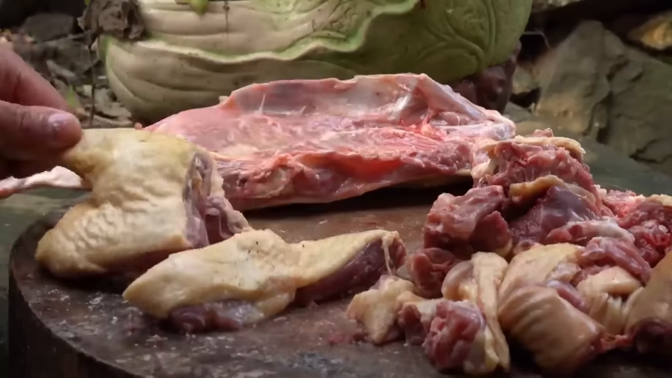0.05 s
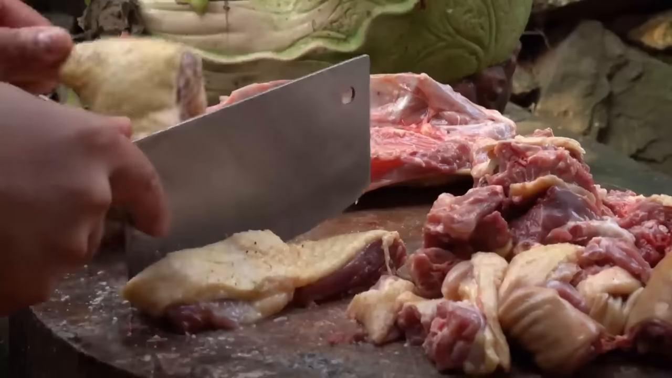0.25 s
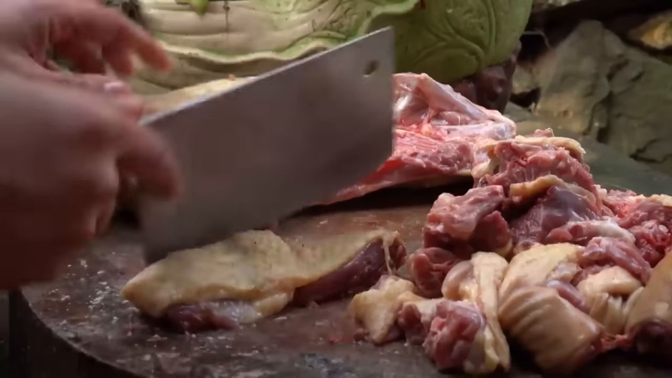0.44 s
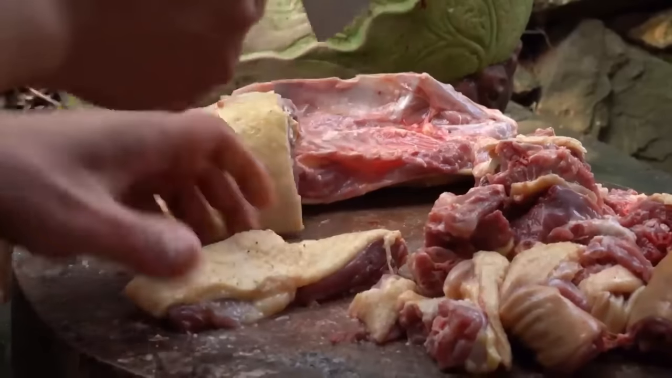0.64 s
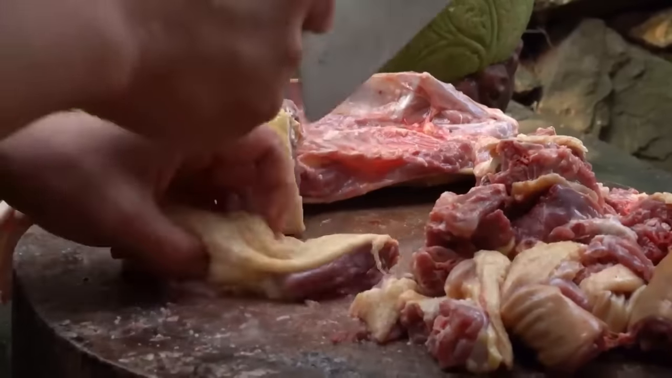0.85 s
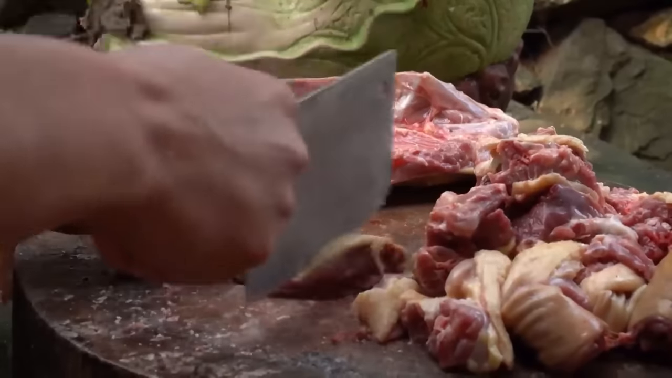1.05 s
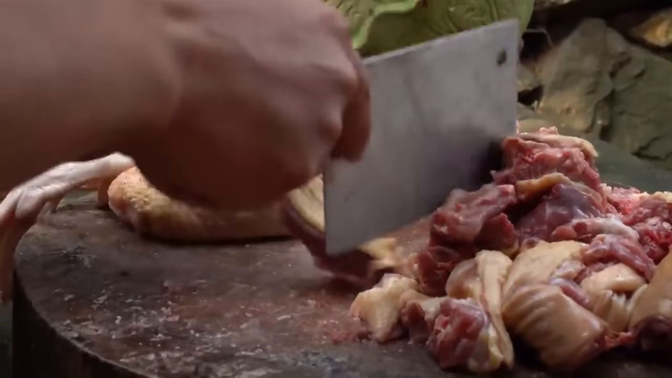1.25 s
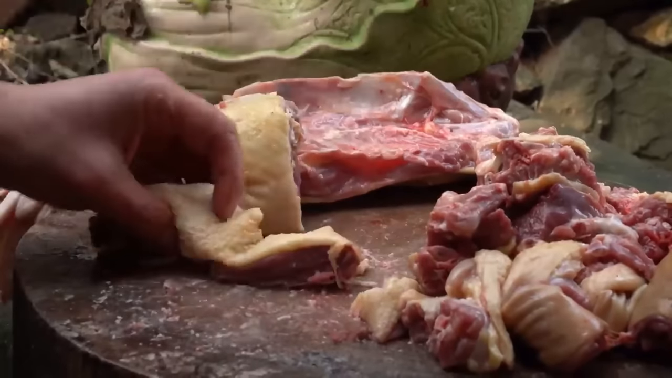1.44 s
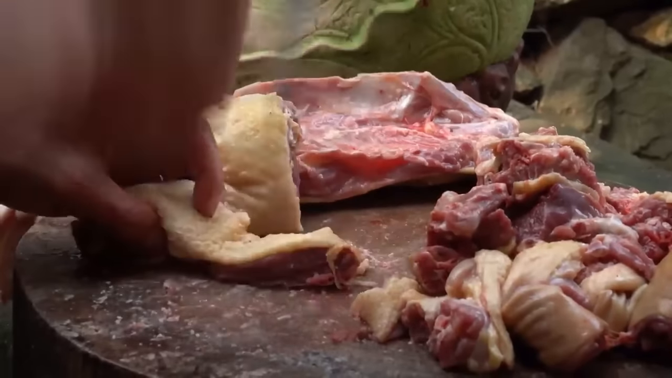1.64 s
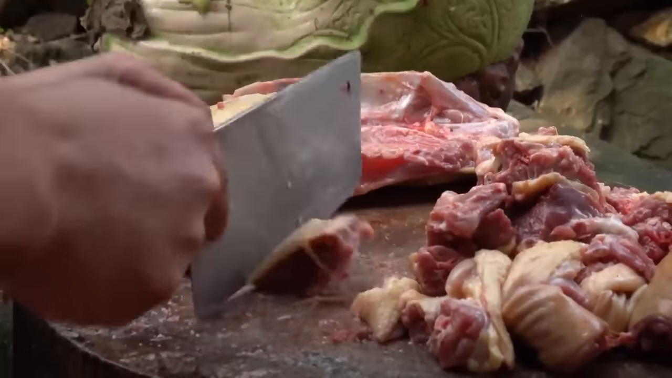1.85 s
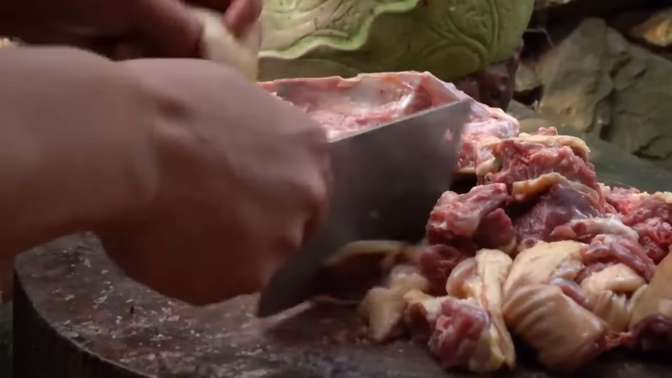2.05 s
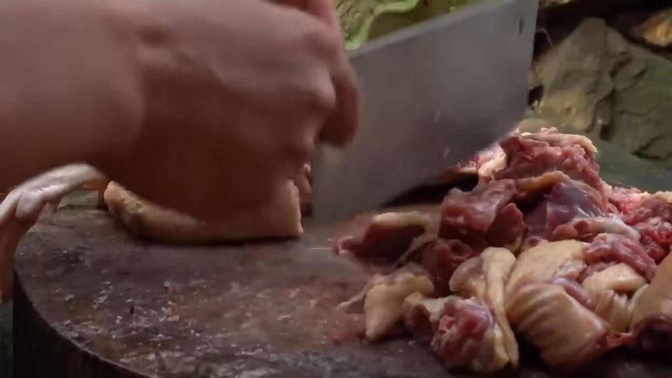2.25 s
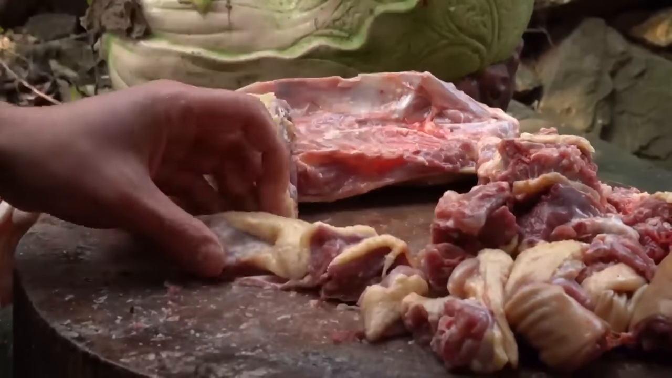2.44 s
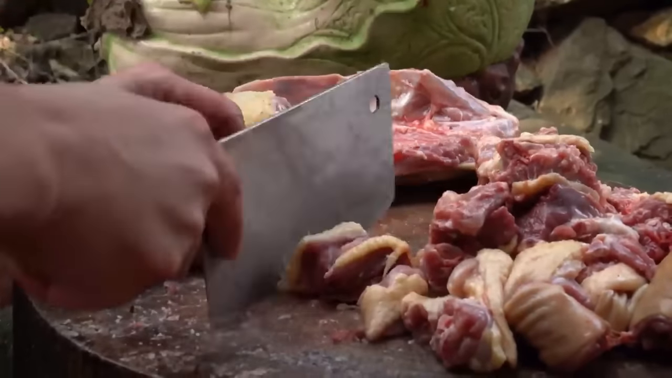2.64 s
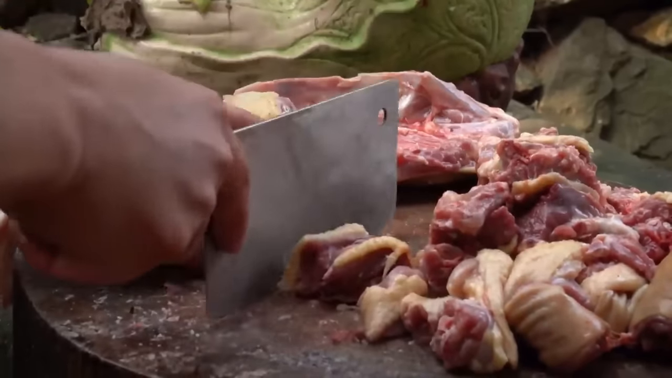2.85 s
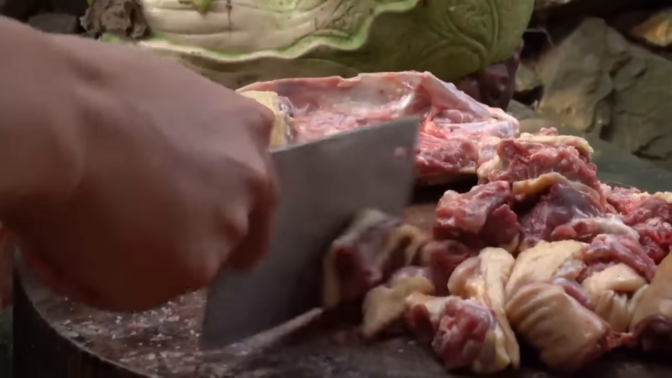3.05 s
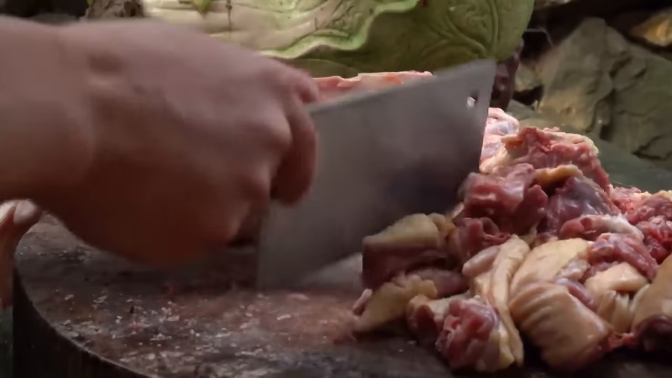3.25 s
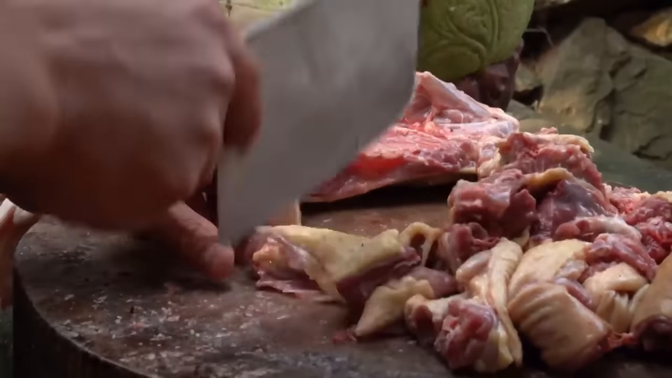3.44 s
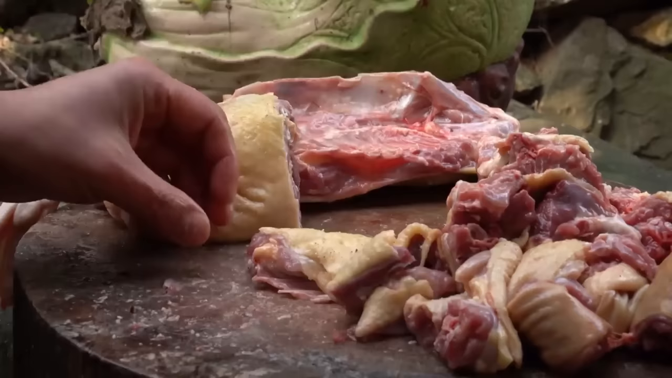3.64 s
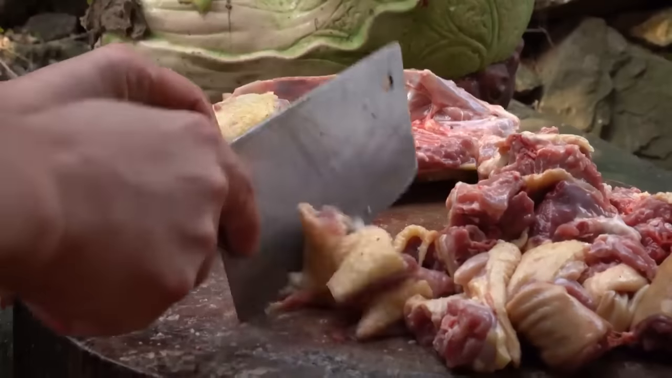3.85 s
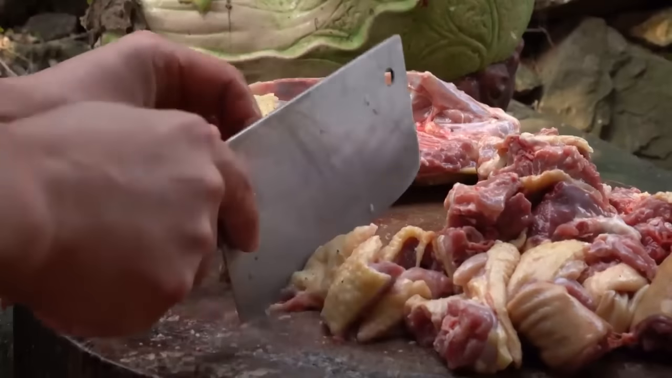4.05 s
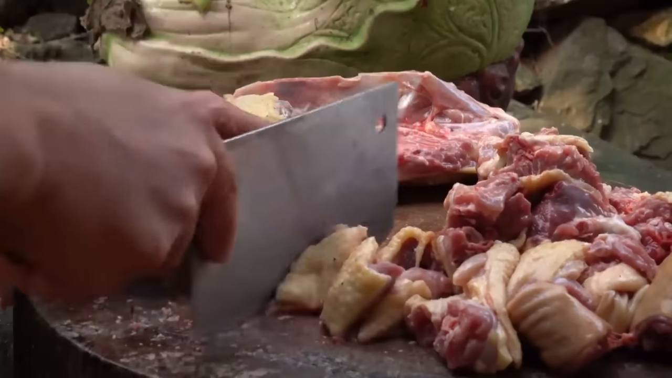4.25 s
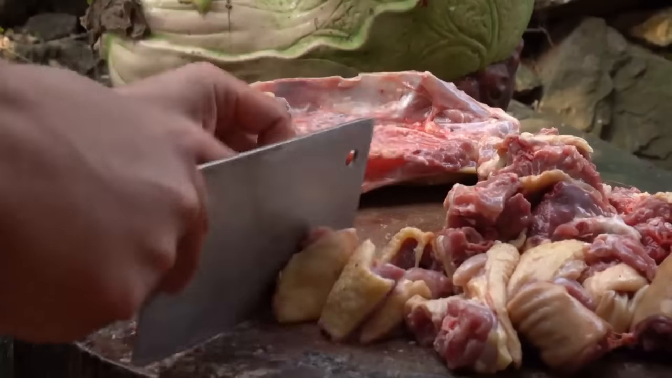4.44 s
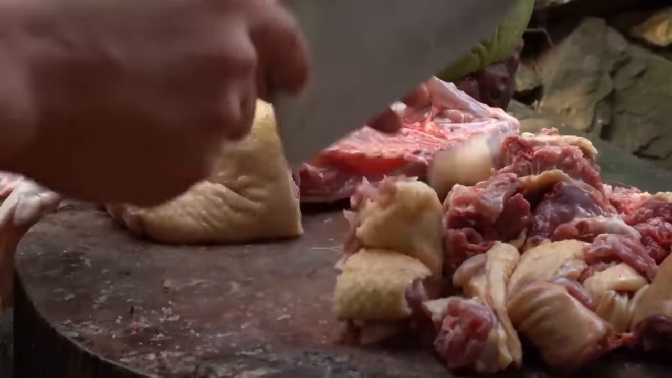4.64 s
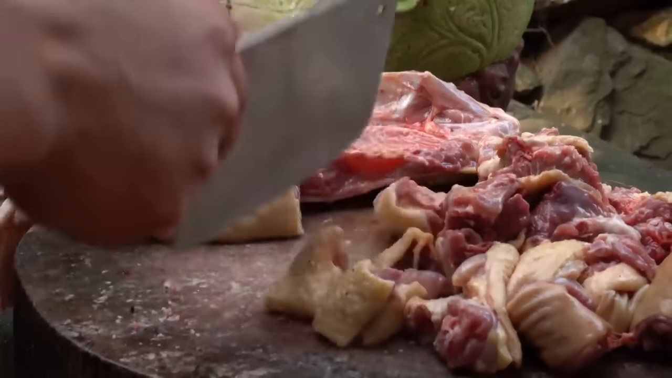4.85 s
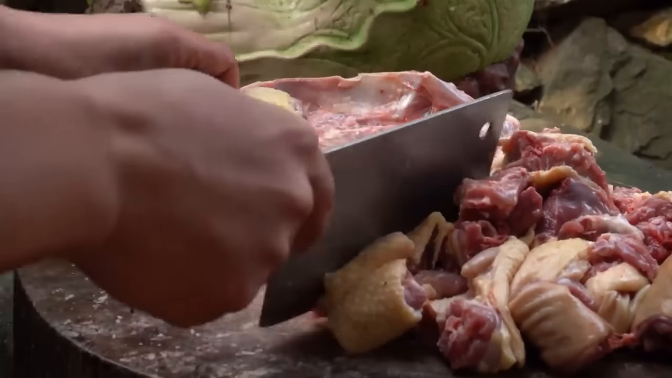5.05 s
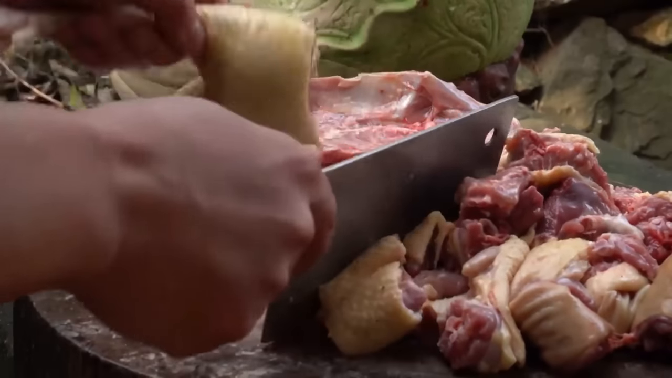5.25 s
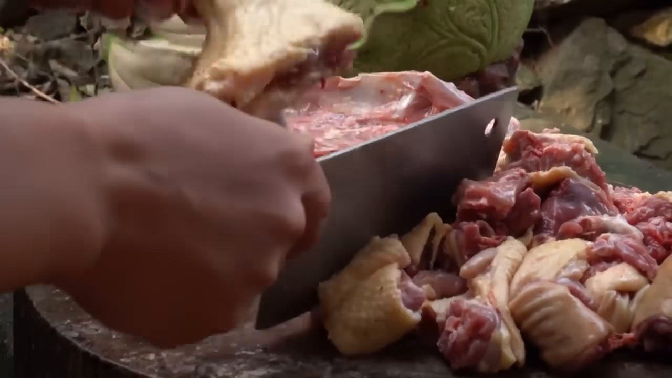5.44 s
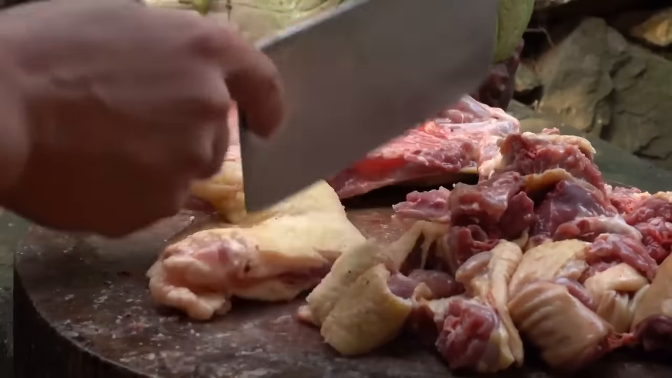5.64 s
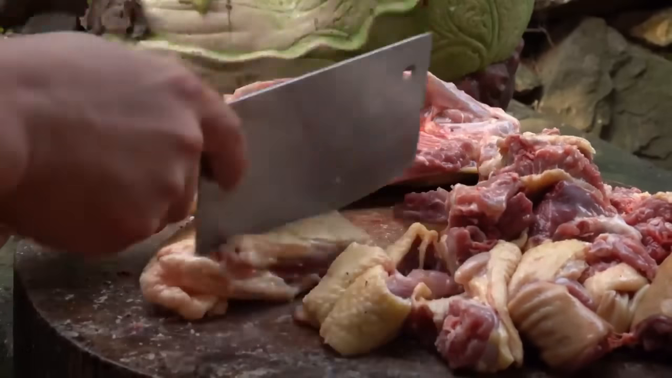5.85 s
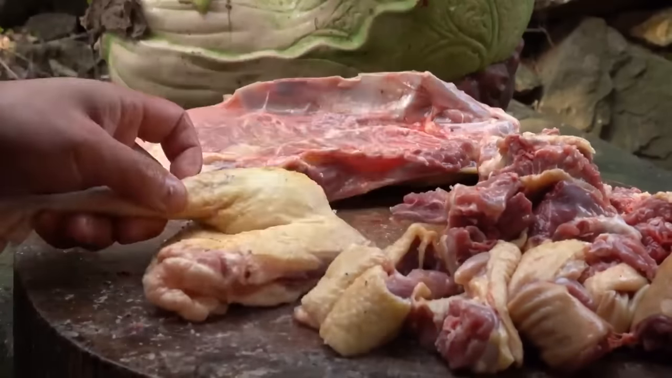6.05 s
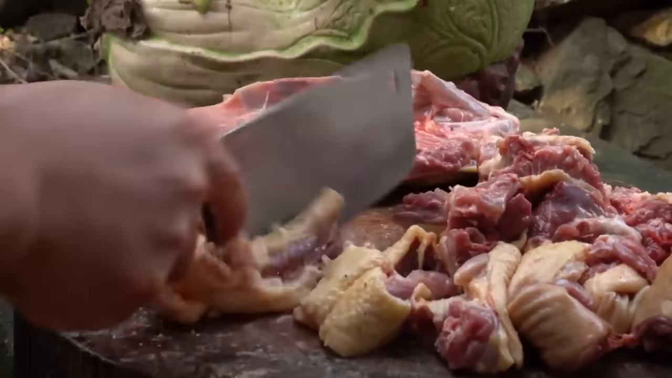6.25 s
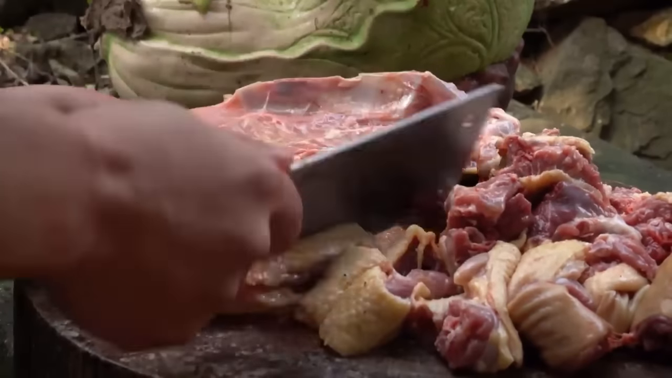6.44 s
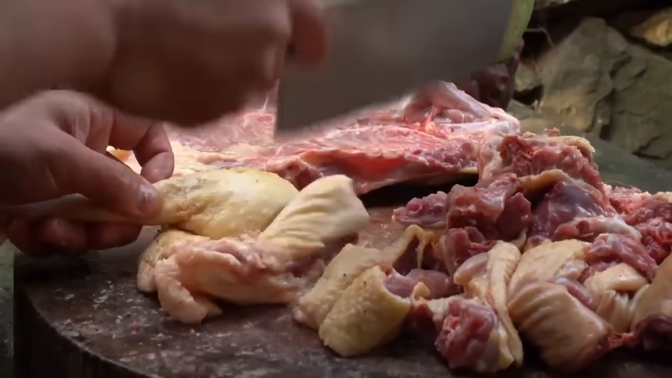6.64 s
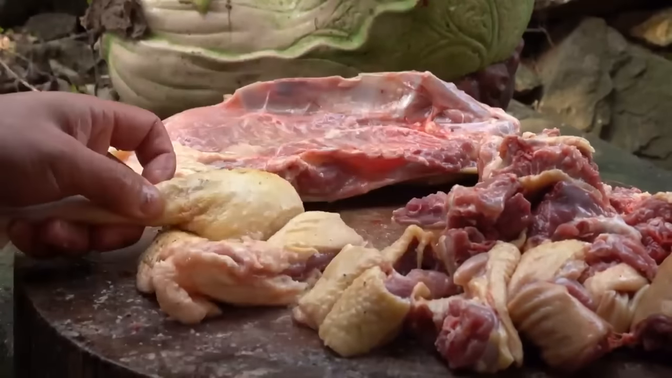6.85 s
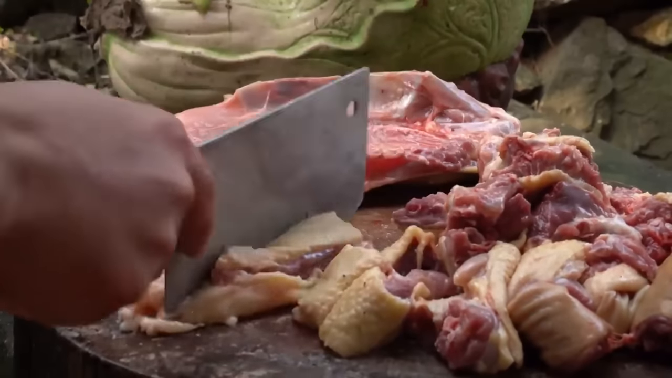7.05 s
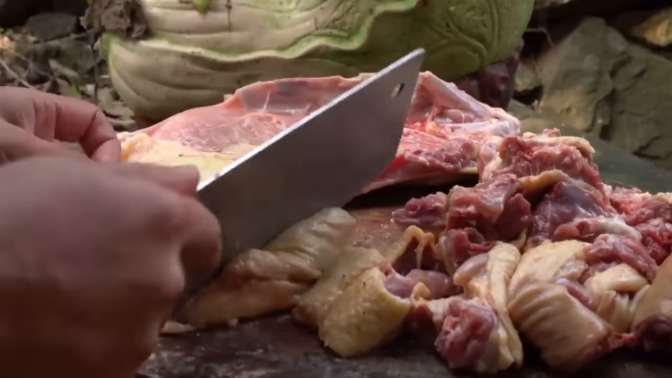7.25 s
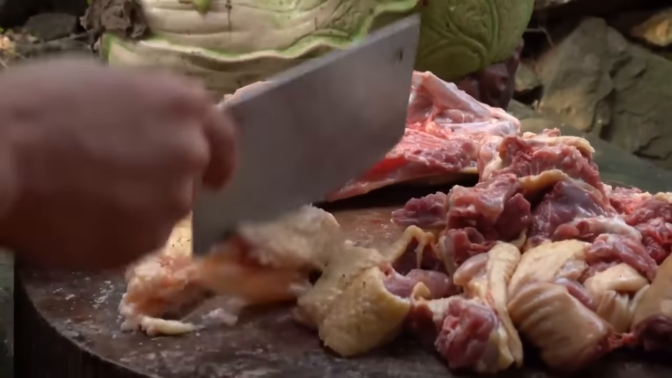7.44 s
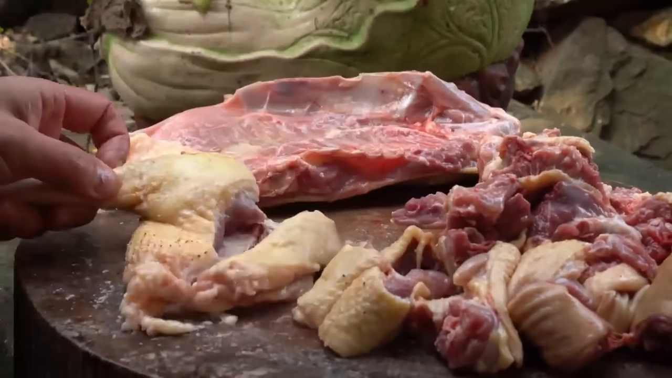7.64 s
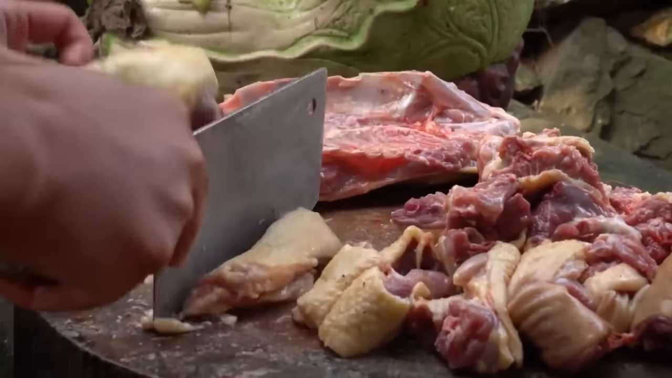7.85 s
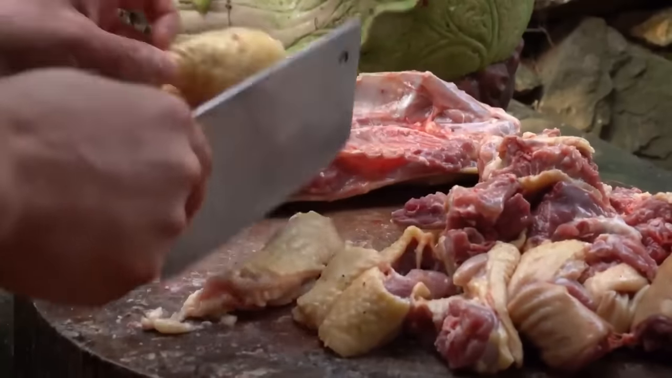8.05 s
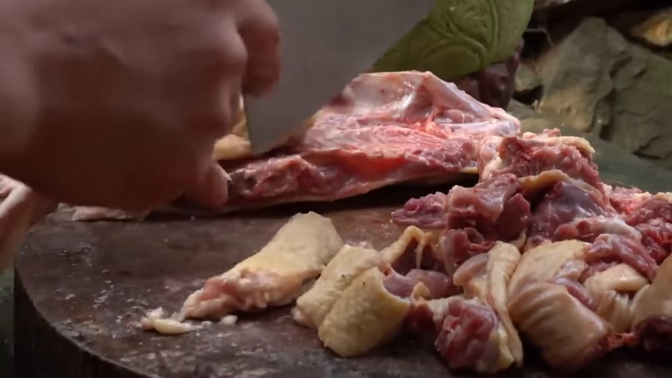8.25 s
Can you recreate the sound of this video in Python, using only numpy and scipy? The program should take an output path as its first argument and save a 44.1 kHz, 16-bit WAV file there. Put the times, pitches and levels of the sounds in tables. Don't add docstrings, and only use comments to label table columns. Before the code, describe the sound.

Close stereo sound of butchering in an open yard: splintering bone cracks, solid wooden thuds and knocks, then ringing metal and brief diffuse echoes. Strong chops alternate with lighter contacts, blade drags, moist peeling, small clicks and short squeaks. The later blows come quicker, one of them ringing loudest. Steady soft air lies beneath, with a few hoarse distant bird whistles.

```python
import sys
import numpy as np
from scipy import signal
from scipy.fft import rfft, irfft, next_fast_len
from scipy.io import wavfile
from scipy.ndimage import uniform_filter1d

SR = 44100
rng = np.random.default_rng(int(sys.argv[2]) if len(sys.argv) > 2 else 0)


def volts(x):
    e = np.asarray(x, float) / 20
    return 10 ** e


def pcm_store(signal):
    levels = np.round(np.clip(np.atleast_2d(signal), -1, 1) * 32767)
    wavfile.write(sys.argv[1], SR, levels.astype(np.int16).T)


N = 366471
MIC_CUT_HZ = 150


def rms_one(x):
    return x / np.sqrt(np.mean(x ** 2) + 1e-20)


def at_hz(points, hz):
    table_hz, values = np.transpose(points)
    return np.interp(np.log(hz), np.log(table_hz), values)


def add(track, s, sound):
    i = round(s * SR)
    track[..., i:i + sound.shape[-1]] += sound[..., :N - i]


def pan(db):
    return volts([[db / 2], [-db / 2]])


def ring(x, hz, t60):
    r = volts(-60 / (max(t60, .001) * SR))
    w = 2 * np.pi * hz / SR
    return signal.lfilter([0, np.sin(w)], [1, -2 * r * np.cos(w), r * r], x + 1e-18)


def edge(x, hz, kind):
    return signal.sosfilt(signal.butter(2, hz, kind, fs=SR, output="sos"), x)


def grains(shape, per_s, spread_db):
    sizes = volts(spread_db * np.minimum(rng.exponential(1, shape), 4)) * rng.choice([-1, 1], shape)
    return sizes * (rng.random(shape) < per_s / SR)


EDGES = 30 * 2 ** np.arange(0, 9.6, .5)
ECHO_PATCHY_DB, ECHO_PATCH_HZ = 2.2, 35


def bands(white, spectrum, likeness, t60=None):
    out, t = 0, np.arange(white.shape[-1]) / SR
    for k, (low, high) in enumerate(zip(EDGES, np.minimum(EDGES[1:], .49 * SR))):
        hz = np.sqrt(low * high)
        level_db = at_hz(spectrum, hz)
        if t60:
            patches = rms_one(edge(rng.standard_normal(len(t)), ECHO_PATCH_HZ, "low"))
            level_db = level_db - 60 * t / at_hz(t60, hz) + ECHO_PATCHY_DB * patches
        elif level_db < -30:
            continue
        band = signal.butter(2, [low, high], "band", fs=SR, output="sos")
        mid, side = signal.sosfilt(band, white[k % 2])
        alike = np.clip(at_hz(likeness, hz), 0, 1)
        stereo = np.sqrt(1 + alike) * mid + np.sqrt(1 - alike) * side * [[1], [-1]]
        out = out + volts(level_db) * stereo
    return out


# (frequency [Hz], density [dB per Hz])
YARD = [(18, -59), (30, -35), (167, -3.5), (455, 0.5), (547, 4.5), (752, 3), (1530, -1.5), (5160, -5),
        (6550, -11), (14800, -7), (16500, -25)]
# (frequency [Hz], likeness [0-1])
YARD_LIKENESS = [(60, 0.7), (180, 1), (550, 0.4), (1650, 0), (4970, 0.47), (15000, 0.09)]
YARD_DB = -61.5


def yard_air():
    return volts(YARD_DB) * rms_one(bands(rng.standard_normal((2, 2, N)), YARD, YARD_LIKENESS))


# (start [s], length [s], first pitch [Hz], last pitch [Hz], level [dB])
BIRD = [
    (1.53, 0.13, 2980, 2930, -49.5),
    (3.544, 0.22, 3060, 2780, -49.5),
    (4.528, 0.137, 3530, 3400, -44.5),
    (4.65, .11, 3100, 2780, -43),
    (4.75, .06, 2800, 2750, -50),
    (8.219, .12, 3500, 3300, -46.5),
]
CALL_ATTACK_S, CALL_RELEASE_S, CALL_BLUR_HZ, BIRD_TRIM_DB = 0.016, .05, 90, -9


def bird():
    out = np.zeros((2, N))
    for s, length_s, first_hz, last_hz, db in BIRD:
        t = np.arange(round(length_s * SR)) / SR
        slide = (1 + np.cos(np.pi * np.clip(t / length_s / 0.91, 0, 1))) / 2
        hz = last_hz + (first_hz - last_hz) * slide
        shape = np.clip(np.minimum(t / CALL_ATTACK_S, (length_s - t) / CALL_RELEASE_S), 0, 1)
        whistle = np.sin(2 * np.pi * np.cumsum(hz) / SR)
        add(out, s, volts(db + BIRD_TRIM_DB) * shape * whistle * [[1], [1]])
    blur = rms_one(edge(rng.standard_normal((2, N)), CALL_BLUR_HZ, "low"))
    return out * (0.23 + blur)


# (time [s], boom of the stand [dB], knock of the wood [dB], crack of the bone [dB])
SENDS = [(0.218, -5, -4, -14.5), (1.291, -23.5, -38.5, -24.5), (1.78, -1.5, 1.5, -16.5),
         (2.726, -5.5, 0.5, -18.5), (3.933, 1, -3.5, -13.5), (5.019, -25, -20, -40), (5.684, -55, -30, -37),
         (6.011, -41, -52, -43), (6.346, 8.5, -2, -16.5), (7.008, 4, -0.5, -21), (7.761, -35, -42, -30),
         (7.828, -10, -2.1, -18.5)]
CLACK_OVER_CRACK_DB = 6


def sends():
    out, parts = np.zeros(N), np.tile(signal.unit_impulse(SR // 40), (4, 1))
    for k, hz in enumerate((450, 1500, 4500)):
        parts[k] = edge(edge(parts[k], hz, "low"), hz, "low")
        parts[k + 1] = edge(edge(parts[k + 1], hz, "high"), hz, "high")
    for s, boom_db, knock_db, crack_db in SENDS:
        add(out, s, volts([boom_db, knock_db, crack_db + CLACK_OVER_CRACK_DB, crack_db]) @ parts)
    return out


# (frequency [Hz], density [dB per Hz])
ECHO = [(24, -71), (40, -48.5), (438, -13.5), (782, -6), (1000, -2.5), (1360, -3), (1710, 2), (2830, -4),
        (9010, -6), (14900, -30.5), (16500, -68)]
# (frequency [Hz], decay by 60 dB [s])
ECHO_T60 = [(60, 0.61), (250, 0.55), (700, .35), (2000, 0.28), (6000, 0.27), (14000, 0.14)]
# (frequency [Hz], likeness [0-1])
ECHO_LIKENESS = [(60, 1), (250, 1), (700, 0.6), (1500, 0.4), (4000, 0.55), (12000, 0)]


def echoes(send):
    t = np.arange(SR) / SR
    answer = bands(rng.standard_normal((2, 2, SR)), ECHO, ECHO_LIKENESS, ECHO_T60)
    early_rms = np.sqrt(np.mean(answer[:, :SR // 20] ** 2))
    answer = answer / early_rms * np.clip((t - .002) / 0.02, 0, 1)
    return volts(-1.0) * signal.fftconvolve(send[None], answer, axes=1)[:, :N]


STROKE_ROUNDNESS = 1.06


def swells(rows):
    t, level_db = np.arange(0, N, 32) / SR, -110
    for s, rise_s, fall_s, db in rows:
        away = np.where(t < s, (s - t) / max(rise_s, .005), (t - s) / max(fall_s, .005))
        level_db = np.maximum(level_db, db - 20 * away ** STROKE_ROUNDNESS)
    return np.interp(np.arange(N) / SR, t, level_db)


# (peak
# [s], rise [s], fall [s], hiss level [dB], dull rub over the hiss [dB])
STROKES = [(.38, 0.046, 0.57, -44.5, -5), (.83, 0.099, 0.4, -45.5, -0.2), (5.677, 0.02, 0.08, -43, -6.5),
           (1.46, .05, 0.25, -49, -14), (2.133, 0.02, 0.03, -34, 6), (2.196, 0.071, 0.084, -42, 2),
           (2.416, 0.014, 0.045, -33, -4.5), (3.03, 0.14, 0.45, -44, -1.5),
           (3.137, 0.04, 0.07, -37.5, -3.5), (3.182, 0.071, 0.081, -40, -1.5), (4.361, .09, 0.18, -37, -10),
           (4.444, 0.22, 0.072, -34, -7.5), (4.579, 0.043, .13, -40.5, -3.5),
           (4.74, 0.047, 0.071, -50.5, 0.5), (5.07, 0.023, 0.1, -36, 0), (5.16, .06, 0.25, -51, -12),
           (5.28, 0.048, .04, -46, -3), (6.58, 0.03, 0.075, -43.5, -7), (6.77, 0.092, 0.072, -45.5, -3),
           (6.816, 0.028, 0.087, -43.5, 1.5), (5.935, .015, .06, -50, -3), (7.275, 0.012, 0.13, -41, -2.5),
           (8.15, 0.058, 0.11, -55, 6), (1.31, 0.015, 0.1, -27, -2.5), (6.015, 0.012, 0.14, -30, -6)]
# (peak [s], hiss level [dB], dull rub over the hiss [dB])
SWINGS = [
    (0.207, -46, 2),
    (1.278, -48.5, -7),
    (2.71, -55, 1),
    (5.95, -55, 0.5),
    (6.991, -56.5, 8),
]
# (time [s], level [dB])
HANDLING = [(0, -52), (.65, -50.5), (.97, -57.5), (1.25, -56.5), (1.6, -64), (1.76, -58.5), (2.2, -57),
            (2.449, -59.5), (3.3, -58), (3.67, -65), (3.921, -56.5), (4.76, -59), (5.0, -64), (5.4, -62.5),
            (6.3, -57.5), (6.65, -56), (7.5, -56.5), (8.31, -55)]
# (peak [s], rise [s], fall
# [s], level [dB])
PEELS = [
    (.2, .1, 0.038, -43),
    (.43, 0.6, 0.43, -45),
    (1.45, .04, 0.36, -68.5),
    (3.04, 0.13, 0.58, -50.5),
    (4.364, 0.027, .15, -39),
    (6.014, .012, 0.11, -29),
    (6.816, 0.023, 0.057, -46.5),
]
# (frequency [Hz], width [Hz], level [dB])
SCRAPE = [(1053, 66, -4.5), (2200, 90, -9), (3920, 67, -7), (4610, 130, -4), (6710, 120, -11.5),
          (9380, 170, -7.5)]
# (frequency [Hz], density [dB per Hz])
RUB = [(88, -33), (150, -23), (593, -6.5), (871, -6.5), (1060, -1.5), (1160, -6), (2160, 2), (4000, 4),
       (5200, -69), (8800, -120)]
# (frequency [Hz], density [dB per Hz])
HISS = [(1180, -59.5), (2000, 4.5), (5570, -13.5), (7320, -5), (15100, -18), (16100, -25), (16500, -39)]
SWING_RISE_S, SWING_FALL_S, STROKE_AIR_DB = 0.42, 0.022, -9
HANDLING_RUB_DB, HANDLING_AIR_DB = 1, -6.5
HISS_FROM_HZ, AIR_FROM_HZ = 2800, 8700
SCRAPE_RING, SHARED_SLIP_DB = 2.8, 4.6


def drags():
    swings = [(s, SWING_RISE_S, SWING_FALL_S, db, rub_db) for s, db, rub_db in SWINGS]
    strokes = np.array(STROKES + swings)
    hands_db = np.interp(np.arange(N) / SR, *np.transpose(HANDLING))
    stroke_db = swells(strokes[:, :4])
    stroke_rub_db = swells([(*row[:3], row[3] + row[4]) for row in strokes])
    rub_db = np.maximum(hands_db + HANDLING_RUB_DB, stroke_rub_db)
    hiss_db = np.maximum(hands_db, stroke_db)
    air_db = np.max([hands_db + HANDLING_AIR_DB, stroke_db + STROKE_AIR_DB, swells(PEELS)], axis=0)

    fast_clumps = rms_one(edge(rng.standard_normal(N), 140.0, "low"))
    slow_clumps = rms_one(edge(rng.standard_normal(N), 34.0, "low"))
    slips = grains((2, 2, N), 2500.0, SHARED_SLIP_DB) + 0.68 * rng.standard_normal((2, 2, N))
    slips = slips * volts(1.2 * fast_clumps + 1.57 * slow_clumps)
    for hz, width, db in SCRAPE:
        slips = slips + volts(db) * 2 * np.pi * width / SR * ring(slips, hz, SCRAPE_RING / width)

    alike = [(300, 0.98), (1500, 0.54), (8000, 0.15)]   # (Hz, left-right likeness)
    rub = edge(bands(slips, RUB, alike), HISS_FROM_HZ, "low")
    bright = edge(bands(slips, HISS, alike), HISS_FROM_HZ, "high")
    hiss = edge(bright, AIR_FROM_HZ, "low")
    air = edge(edge(bright, AIR_FROM_HZ, "high"), AIR_FROM_HZ, "high")
    air = edge(air, 14300, "low")
    return volts(rub_db) * rms_one(rub) + volts(hiss_db) * rms_one(hiss) + volts(air_db) * rms_one(air)


# (start [s], length [s], frequency [Hz], level [dB])
SQUEAKS = [(1.296, .06, 6520, -34), (1.298, .05, 5300, -36), (1.296, .06, 1750, -33),
           (3.015, .1, 1730, -50), (3.01, .08, 4300, -52), (3.02, .09, 6500, -53), (3.128, .02, 1420, -40),
           (3.126, .024, 2220, -39), (3.13, .016, 2900, -43), (3.122, .02, 5130, -46),
           (3.17, .015, 2150, -41), (3.171, .013, 4700, -42), (4.3, .11, 3800, -50), (4.33, .19, 2000, -46),
           (4.37, .09, 7300, -45), (4.385, .035, 1050, -49), (4.39, .04, 6500, -47), (4.36, .07, 8700, -49),
           (4.43, .04, 2600, -46), (4.54, .07, 7100, -53), (4.59, .03, 2100, -48), (4.63, .025, 1350, -49),
           (5.04, .06, 1850, -40), (5.055, .04, 7900, -47), (5.05, .04, 3600, -46), (7.763, .03, 1800, -39),
           (5.695, .07, 1050, -46), (5.7, .05, 1560, -44), (5.7, .04, 2150, -45), (5.021, .02, 1020, -25),
           (7.012, .05, 2550, -30), (2.451, .008, 1500, -44), (2.117, .025, 6300, -44),
           (2.195, .02, 2200, -42), (2.13, .03, 1400, -36), (6.003, .03, 800, -36)]
SQUEAK_WIDTH_HZ, SQUEAK_WIDER = 40, .02


def squeaks():
    out = np.zeros((2, N))
    for s, length_s, hz, db in SQUEAKS:
        slips = rng.standard_normal((3, SR // 4))
        slips = edge(slips[0] + .5 * slips[1:], .7 * hz, "high")
        sung = ring(slips, hz, 2.2 / (SQUEAK_WIDTH_HZ + SQUEAK_WIDER * hz))
        sung = sung[:, SR // 50:]
        t = np.arange(sung.shape[1]) / SR
        add(out, s, volts(db) * rms_one(sung) * np.sin(np.pi * np.clip(t / length_s, 0, 1)))
    return out


# (time [s], peak level [dB], centre [Hz], hiss over the peak [dB])
TICKS = [(0.478, -47, 910, -11), (0.598, -50, 1160, -7), (0.91, -33, 7100, -10), (1.116, -40.5, 2800, 2.5),
         (1.172, -45, 3470, -9), (1.189, -47, 4530, -8), (1.217, -47, 1330, -12), (2.107, -44, 600, -1),
         (2.131, -33, 1370, -3), (2.187, -35, 3520, -15), (2.195, -52, 2190, -9), (3.134, -41, 2250, -12),
         (3.174, -40.5, 2220, -4), (3.358, -48, 4200, -1), (3.39, -45, 1024, 5.5), (3.592, -47, 1940, 6.5),
         (4.354, -41, 2200, -4.5), (4.398, -43, 1120, 2), (4.578, -45, 3780, 2), (4.609, -40.5, 3320, 0),
         (4.731, -48, 1680, 0), (4.927, -51, 1870, -4), (5.282, -54, 231.5, -10), (5.927, -52, 2200, 4),
         (6.58, -77, 1270, -7), (6.75, -51, 2200, 6), (6.815, -40, 1100, -6), (7.28, -42.5, 1240, 9),
         (8.14, -44, 346, -15)]
# (time [s], peak level [dB], centre [Hz], hiss over the peak [dB])
MORE_TICKS = [(1.119, -34, 3160, -7), (1.489, -34, 2510, -1.5), (2.185, -35.5, 3170, -11),
              (2.406, -40, 1000, 4), (2.414, -36, 3200, -3), (5.545, -50, 1500, -8),
              (3.839, -49, 7930, -14.5), (4.631, -37, 5500, -3), (5.168, -49.5, 3220, -13),
              (5.204, -47.5, 3100, -12), (5.262, -49.5, 5330, -6)]
BLOCK_PAN_DB, MORE_PAN_DB = -0.3, 0
TICK_T60_S, TICK_CYCLES, TICK_CREST_DB, LEAD_CLICK = 0.022, 17, 8, 3.0


def ticks():
    out, t = np.zeros((2, N)), np.arange(SR // 8) / SR
    rows = [(*row, BLOCK_PAN_DB) for row in TICKS] + [(*row, MORE_PAN_DB) for row in MORE_TICKS]
    for s, db, hz, hiss_db, pan_db in rows:
        shape = np.clip(t / 0.0022, 0, 1) ** 2 * volts(-60 * t / (TICK_T60_S + 21.3 / hz))
        clicks = (grains(len(t), 7300.0, 2.1) + .5 * rng.standard_normal(len(t))) * shape
        clicks[SR // 400] = LEAD_CLICK
        t60 = min(TICK_CYCLES / hz, .015)
        modes = ((.68, 0.13), (1, 1), (1.4, .55))
        body = sum(gain * ring(clicks, hz * ratio, t60) for ratio, gain in modes)
        body = edge(body, 0.66 * hz, "high")
        hiss = edge(edge(clicks, 1670, "high"), 7800, "low")
        sound = body / abs(body).max() + volts(hiss_db) * hiss / abs(hiss).max()
        add(out, s, volts(db + TICK_CREST_DB) * sound * pan(pan_db))
    return out


# (frequency [Hz], decay by 60 dB [s], swell [s])
METAL = [(918.6, .4, 0.022), (968, 1.04, 0.025), (1258, 0.8, .05), (1486, 1.86, .03), (3413, 0.32, .0052),
         (1730, 0.37, 0.013)]
# (start [s], level [dB], damped at [s])
RINGS = [
    [(.22, -12.5, 0.61), (1.78, -17, 1.6), (2.73, -12, 3.5), (3.935, -16, 4.6), (6.35, -12, 6.4),
     (7.01, -4.5, 7.32), (7.83, -14, 8.2)],
    [(5.025, -51, 6.2)],
    [(1.79, -26, 2.27), (2.73, -26.5, 3.28), (3.935, -30.5, 4.6), (6.35, -27.5, 6.88), (7.01, -19.5, 7.72),
     (7.83, -27.5, 8.34)],
    [(.62, -58, 0.86), (1.39, -43, 1.76), (5.745, -45, 5.915), (6.1, -61, 8.5)],
    [(1.365, -33, 1.48)],
    [(3.021, -56, 3.12)],
]


def metal():
    out, t = np.zeros(N), np.arange(SR) / SR
    for (hz, t60, swell_s), table in zip(METAL, RINGS):
        for s, db, stop_s in table:
            fall_db = 60 * t / max(t60, .1) + 290.0 * np.maximum(t + s - stop_s, 0)
            shape = (1 - np.exp(-t / max(swell_s, .002))) * volts(db - fall_db)
            add(out, s, shape * np.sin(2 * np.pi * (hz * t + rng.random())))
    return out


# (frequency [Hz], level over the knock [dB], decay by 60 dB [s])
STAND = [(306, -18, 0.26), (428, -22, 0.35), (519, -15, 0.28), (650, -15, 0.24), (826, -16, .2),
         (1010, -19, 0.13), (1121, -17, 0.2), (1720, -20, .2), (2180, -26, .2), (2600, -28, .2)]


def stand():
    out, t = np.zeros(N), np.arange(SR // 2) / SR
    chance = rng.standard_normal((len(SENDS), len(STAND), 3))
    for (s, boom_db, knock_db, *_), draws in zip(SENDS, chance):
        for (hz, db, t60), (strength, detune, phase) in zip(STAND, draws):
            shape = (1 - np.exp(-t / 0.011)) * volts(knock_db + db + 2.2 * strength - 60 * t / t60)
            beat = 1 + 1.1 * np.sin(2 * np.pi * (22.1 * t + detune))
            add(out, s, shape * beat * np.sin(2 * np.pi * (hz * (1 + 0.0238 * detune) * t + phase)))
    return out


# (time [s], peak level [dB], pitch ratio, fall to both sides of 800 Hz [dB per
KNOCKS = [
    (5.0218, -10, 1.01, 0),
    (5.6845, -22, 1.3, -15),
    (7.0068, -13, 1.3, 0),
    (2.7285, -14, 1.2, -3),
    (7.8295, -11, 1.22, -12),
    (6.3485, -11, .8, -8),
    (1.779, -12, 1.15, -4),
]
# (frequency [Hz], level [dB], decay by 60 dB [s])
BARE_WOOD = [(350, -16.5, 0.16), (680, -6.5, 0.23), (793, 5.5, 0.066), (1840, 15, 0.016),
             (2410, -28, 0.052)]


def knocks():
    out, click = np.zeros(N), signal.unit_impulse(SR // 6)
    for s, db, ratio, tilt_db in KNOCKS:
        body = 0
        for hz, mode_db, t60 in BARE_WOOD:
            gain = volts(mode_db - abs(tilt_db * np.log2(hz / 800)))
            body = body + gain * ring(click, hz * ratio, min(t60, .12))
        body = edge(edge(body, MIC_CUT_HZ * ratio, "high"), MIC_CUT_HZ * ratio, "high")
        add(out, s, volts(db) * body / abs(body).max())
    return out


# (time [s], thud peak [dB], crack over thud [dB], crunch decay by 60 dB [s],
# cut through meat before the wood [s])
CHOPS = [(0.2197, -12, 6, 0.048, 0.0056), (1.2935, -20, 2, 0.047, 0.0012), (1.778, -10, 1, 0.025, 0.0032),
         (2.7261, -10.5, -1, 0.017, .004), (3.934, -11, 5, 0.085, 0.001), (5.0212, -21, -18, 0.02, 0.00067),
         (5.6845, -13, 4, 0.022, 0.0017), (6.0117, -26, 20, 0.08, 0.01), (6.3428, -8, 2, 0.04, .002),
         (7.0068, -9.5, -1, 0.12, 0.0034), (7.763, -30, 5.5, 0.19, 0.00063),
         (7.828, -12, -3, 0.055, 0.0019)]
# (thud tilt [dB per octave], thud lag [s], bone resonance [Hz], its level [dB], left-right [dB])
CHOP_COLOUR = [(1, .002, 3780, -6, -1), (4, 0.001, 6300, 2, -1), (2, .001, 2100, -2, -2.5),
               (1, .002, 4020, -6, -2.5), (0, .004, 2400, -3, -2.5), (1, .001, 3720, -6, -2.5),
               (-1, .0003, 4200, -5, 1), (1, .001, 6510, -4, -2.5), (-1, .007, 3900, -2, -2.5),
               (2, .003, 2700, 2, -1), (6, .004, 5980, -6, -1.5), (2, .002, 3600, -4, -2.5)]
# (frequency [Hz], width [Hz], level [dB])
BLOCK = [(282, 63, -19.5), (510, 103, -2), (710, 650, -3), (1067, 95, 4), (1360, 137, -1.5),
         (1690, 640, 0.5), (2550, 1140, 3.5), (3660, 360, -0.5)]
SPLINTER_DB, LOOSE_SHARE, SNAP, BONE_CYCLES = 2.8, .45, 2.5, 6.0


def chops():
    near, t = np.zeros((2, N)), np.arange(SR // 5) / SR
    for blow, colour in zip(CHOPS, CHOP_COLOUR):
        s, thud_db, crack_db, crunch_s, cut_s = blow
        tilt_db, lag_s, bone_hz, bone_db, pan_db = colour
        after = t - cut_s
        shape = np.where(after < 0, volts(-14.0), volts(-60 * after / max(crunch_s, .005)))
        shared = grains(len(t), 14000.0, SPLINTER_DB)
        loose = grains((2, len(t)), 16000.0, SPLINTER_DB)
        splinters = (shared + LOOSE_SHARE * loose) * shape
        splinters = splinters * (1 + SNAP * (after > 0) * np.exp(-np.abs(after) / 0.002))

        thud = 0
        for k, (hz, width, db) in enumerate(BLOCK):
            gain = volts(db + tilt_db * np.log2(hz / 1000)) * np.sqrt(width) * (-1) ** k
            thud = thud + gain * ring(splinters, hz, 2.0 / width)
        thud = edge(edge(thud, MIC_CUT_HZ, "high"), MIC_CUT_HZ, "high")

        crack = edge(edge(splinters, 1700, "high"), 10400, "low")
        bone = ring(crack, bone_hz, BONE_CYCLES / bone_hz)
        crack = rms_one(crack) + volts(bone_db) * rms_one(bone)
        gain = volts(thud_db) * pan(pan_db)
        add(near, s - cut_s, gain * volts(crack_db) * crack / abs(crack).max())
        add(near, s - cut_s + max(lag_s, 0), gain * thud / abs(thud).max())
    return near


TOUCH_SEND_DB = -45


def scene():
    touches = ticks()
    wet = echoes(sends() + volts(TOUCH_SEND_DB) * touches.mean(axis=0))
    between = drags() + squeaks() + touches
    blows = metal() + stand() + knocks() + chops()
    return yard_air() + bird() + wet + between + blows


def top_cut(x):
    return signal.sosfilt(signal.butter(12, 16700, fs=SR, output="sos"), x)


# (frequency [Hz], left-right level [dB])
PORT_DB = [(60, 4.5), (130, 0), (290, -1), (640, -4.5), (1410, -2.5), (3100, -1.5), (6820, -2.5),
           (15000, -0.5)]
# (frequency [Hz], left leads by [radians])
PORT_PHASE = [(100, .05), (400, 0.33), (1000, 0.34), (2000, 1.25), (4000, 1.51), (8000, 0.9), (14000, 1.1)]
DUCK_FROM_DB, DUCK_SLOPE, DUCK_DELAY_S, RECOVER_DB_S = -22, .9, 0.014, 85
OVERLOAD = .95


def record(dry):
    size = next_fast_len(N + SR // 10)
    hz = np.maximum(np.arange(size // 2 + 1) * SR / size, 1)
    half = volts(at_hz(PORT_DB, hz) / 2) * np.exp(.5j * at_hz(PORT_PHASE, hz))
    ports = irfft(rfft(dry, size) * [half, 1 / half], size)[:, :N]
    t, depth_db = np.arange(N) / SR, np.zeros(N)
    for s, thud_db, *_ in CHOPS:
        add(depth_db, s + DUCK_DELAY_S, np.array([max(thud_db - DUCK_FROM_DB, 0) * DUCK_SLOPE]))
    depth_db = np.maximum.accumulate(depth_db + RECOVER_DB_S * t) - RECOVER_DB_S * t
    gain = volts(-uniform_filter1d(depth_db, size=300))
    mix = OVERLOAD * np.tanh(ports * gain / OVERLOAD)
    return top_cut(mix)


dry = scene()
out = record(dry)
pcm_store(out)
```